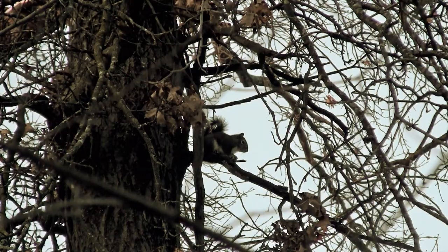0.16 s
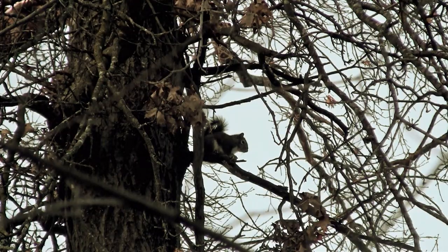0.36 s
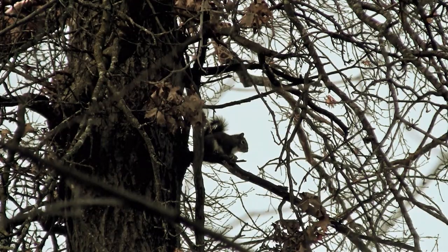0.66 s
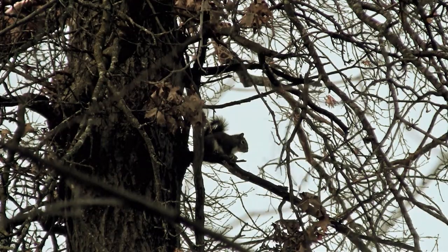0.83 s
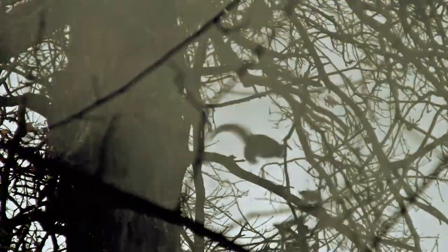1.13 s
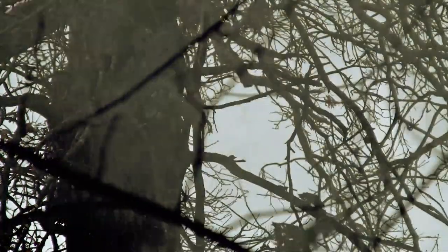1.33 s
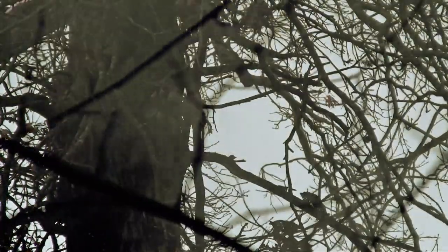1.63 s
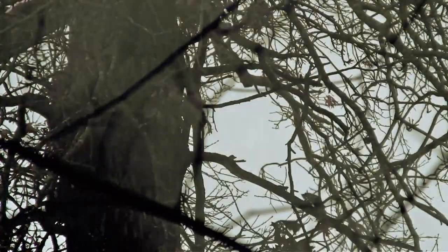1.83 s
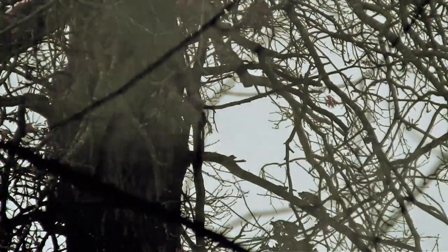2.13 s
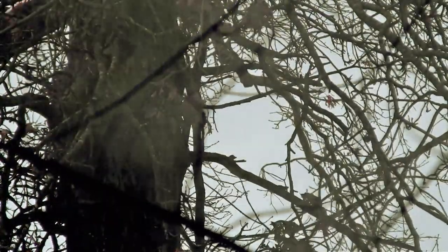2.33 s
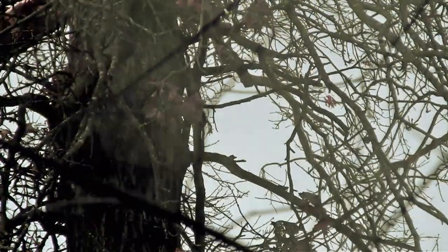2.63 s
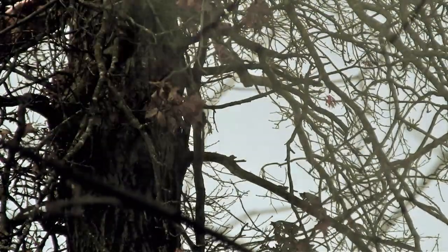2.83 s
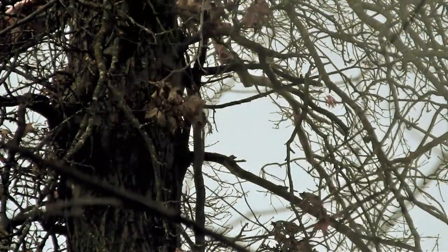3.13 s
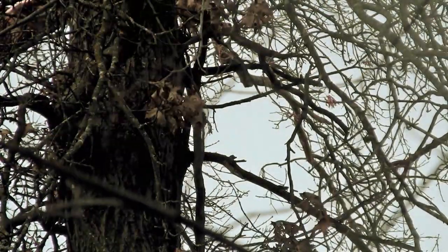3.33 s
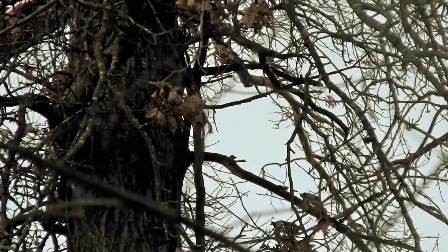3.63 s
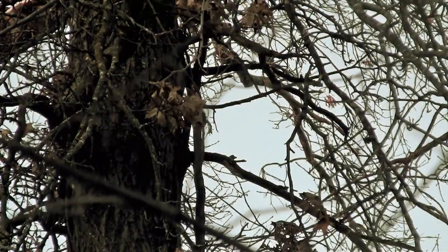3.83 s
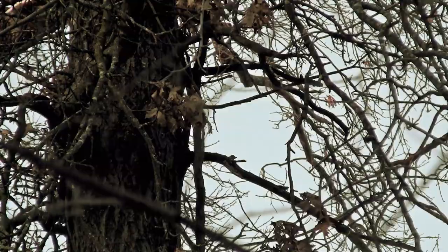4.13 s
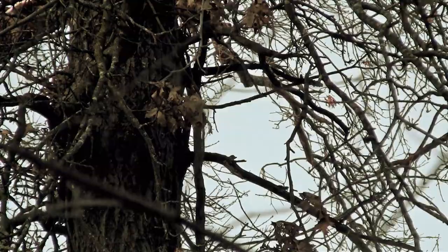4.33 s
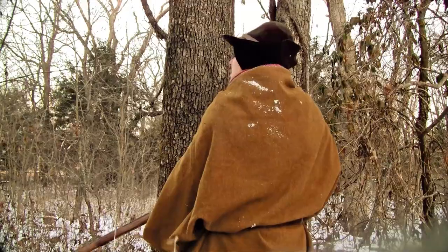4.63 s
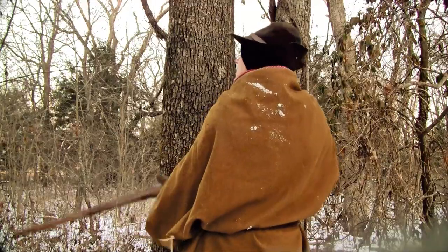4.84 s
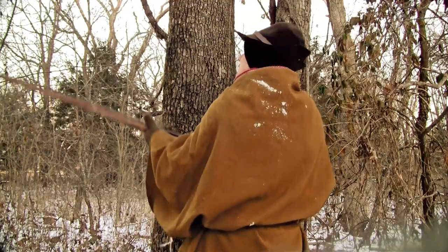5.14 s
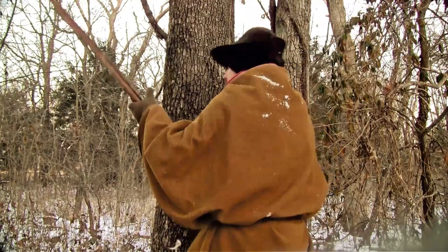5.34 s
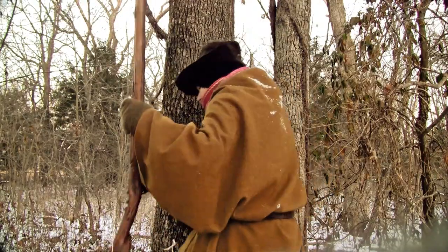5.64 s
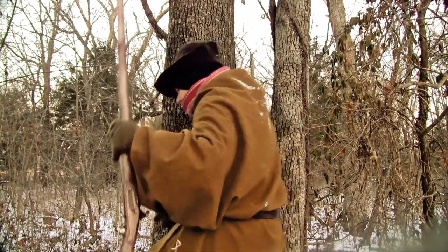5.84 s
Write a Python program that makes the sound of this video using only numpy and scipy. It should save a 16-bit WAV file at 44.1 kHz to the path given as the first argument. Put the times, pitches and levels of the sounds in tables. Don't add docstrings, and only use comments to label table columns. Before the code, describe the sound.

Near-silence outdoors, then a quick metallic rattle of flint on steel, a short powder hiss and a hard, overloaded gun blast. Strong slapping returns merge into a roll about a second long. Debris patters all around in wide stereo over soft leaf hiss, sparser each second. Near the end, a few close woody knocks, small button ticks and cloth swishes sit near the centre.

```python
import sys
import numpy as np
from scipy import signal
from scipy.fft import rfft, irfft, next_fast_len
from scipy.io import wavfile
from scipy.ndimage import uniform_filter1d

SR = 44100
rng = np.random.default_rng(int(sys.argv[2]) if len(sys.argv) > 2 else 0)


def boost_factor(decibels):
    exponent = np.asarray(decibels, float) / 20
    return 10 ** exponent


def to_wav(sig):
    pcm = np.clip(np.atleast_2d(sig), -1, 1) * 32767
    pcm = np.round(pcm).astype(np.int16)
    wavfile.write(sys.argv[1], SR, pcm.T)


N = 263686
T = np.arange(N) / SR
SIZE = next_fast_len(N)
HZ = np.maximum(np.arange(SIZE // 2 + 1) * SR / SIZE, 1)
BLAST_S, BLAST_PUSH_S = .8772, .002


def on_hz(table):
    hz, db = np.transpose(table)
    return boost_factor(np.interp(np.log(HZ), np.log(hz), db))


def walk(rate):
    hold = int(SR / rate)
    held = np.repeat(rng.standard_normal(N // hold + 1), hold)
    return uniform_filter1d(held, hold)[:N]


def grains(rate, spread_db):
    hits = rng.random(N) < rate / SR
    size_db = spread_db * np.minimum(rng.exponential(size=N), 3)
    x = hits * rng.standard_normal(N) * boost_factor(size_db)
    return x / np.std(x)


def wash(source, colour, width, centres_hz, levels_db):
    mid = rfft(source[0], SIZE) * on_hz(colour)
    side = rfft(source[1], SIZE) * on_hz(colour) * on_hz(width)
    out = 0
    for share, db in zip(np.eye(len(centres_hz)), levels_db):
        mask = np.interp(np.log(HZ), np.log(centres_hz), share)
        m = irfft(mid * mask, SIZE)[:N]
        s = irfft(side * mask, SIZE)[:N]
        pair = np.roll(np.array([m + s, m - s]), rng.integers(N), axis=1)
        out = out + boost_factor(db) / np.std(m) * pair
    return out


def curves(table, fade_s):
    s, *columns = np.transpose(table)
    outside = np.maximum(s[0] - T, 0) + np.maximum(T - s[-1], 0)
    return [np.interp(T, s, c) - 60 * outside / fade_s for c in columns]


def swells(floor_db, rows):
    power = boost_factor(2 * floor_db)
    for s, length_s, db in rows:
        power = power + boost_factor(2 * db) * np.exp(-((T - s) / length_s) ** 2)
    return 10 * np.log10(power + 1e-30)


def decay(t60):
    t = np.arange(int(t60 * 1.5 * SR) + 2) / SR
    return t, np.exp(-np.log(1000) * t / t60)


def ring(hz, t60, phase=0, rise_s=.0004):
    t, fade = decay(t60)
    return np.sin(2 * np.pi * hz * t + phase) * fade * (1 - np.exp(-t / rise_s))


def burst(hz, width_hz, t60, rise_s=.0007):
    t, fade = decay(t60)
    edges = np.clip([hz - width_hz / 2, hz + width_hz / 2], 30, .45 * SR)
    sos = signal.butter(3, edges, "band", fs=SR, output="sos")
    y = signal.sosfilt(sos, rng.standard_normal(len(t)) * fade * np.minimum(t / rise_s, 1))
    return y / np.abs(y).max()


def add(out, s, y, pan_db=0.):
    i = int(s * SR)
    y = y[:N - i]
    out[:, i:i + len(y)] += np.outer(boost_factor(np.array([pan_db, -pan_db]) / 2), y)


def add_opposed(out, s, y):
    i = int(s * SR)
    out[:, i:i + len(y)] += np.outer([1, -1], y)


# t/s, level/dB
DRONE_LEVEL = [(0.0, -74), (2.0, -74), (2.4, -91), (2.8, -82), (4.25, -75), (4.4, -75), (4.6, -86),
               (5.5, -78), (5.98, -82)]
# f/Hz, level/dB per Hz
AIR_COLOUR = [(15, -39), (25, -8.5), (59, -13), (86, 1), (169, -16.5), (198, -13), (263, -13.5),
              (361, -12.5), (534, -10.5), (578, -11), (2500, -19.5), (10300, -39.5), (13000, -55)]
# f/Hz, side minus mid level/dB
AIR_SPREAD = [(60, -9.5), (110, -11.5), (200, -0.5), (380, 5), (700, 4), (1290, 3.5), (2380, 0),
              (4400, -1.5), (8120, 2), (15000, 4.5)]


def woods():
    drone = curves(DRONE_LEVEL, 1)[0] + .9 * walk(7)
    air = -64 - .8 + 0.91 * walk(8)
    return wash(rng.standard_normal((2, N)), AIR_COLOUR, AIR_SPREAD, [105, 150], [drone, air])


# t/s, level/dB, dull part level/dB
SIFTING = [(1.5, -56.5, 9), (2.0, -58, 2.5), (2.7, -54.5, 2.5), (3.5, -59, -3.5), (4.35, -57.5, -3.5),
           (4.62, -73.5, 2.5), (5.05, -61, 0), (5.98, -64.5, 6.5)]
# t/s, length/s, level/dB, dull part level/dB
LEAF_AND_WOOL_SWISHES = [(1.486, 0.051, -51.5, 1), (1.723, 0.073, -57.5, 16.5), (1.965, .05, -54.5, 7.5),
                         (2.102, 0.098, -51.5, 2), (2.51, 0.08, -57, 1), (0.0, .015, -64, 6),
                         (2.595, 0.03, -44, -9), (2.632, 0.014, -43, -8), (2.73, .08, -51, -8),
                         (3.166, 0.036, -58.5, 5), (3.297, 0.078, -53.5, -12), (3.53, 0.066, -56.5, -4.5),
                         (3.848, 0.065, -51, -6.5), (4.318, 0.03, -52, -11), (4.799, 0.021, -66, 1),
                         (4.962, 0.036, -62.5, -7.5), (5.061, 0.019, -60.5, -6), (5.308, 0.045, -58.5, 5.5),
                         (5.424, 0.045, -52.5, 1.5), (5.646, 0.071, -43, -1), (5.786, 0.037, -51, -11),
                         (5.925, .025, -52, -2), (5.97, .03, -56, 2)]
# t/s, length/s, level/dB
BOUGH_HEAVES = [(1.97, .07, -65), (2.647, 0.084, -54), (3.4, 0.064, -62.5), (3.698, 0.25, -59),
                (4.402, 0.069, -63.5), (5.151, 0.045, -47), (5.635, 0.091, -54), (5.946, 0.056, -57.5)]
# f/Hz, level/dB per Hz
RUSTLE_TONE = [(88, -40), (150, -22.5), (248, -9.5), (332, -1), (584, 3), (781, 0), (1630, -0.5),
               (2500, -6), (3420, -1), (4750, -7.5), (5770, -2.5), (9370, -4.5), (10900, -4.5),
               (13500, -16), (15000, -9)]
# f/Hz, side minus mid level/dB
RUSTLE_SPREAD = [(60, -12), (110, -11.5), (200, -16), (380, -20), (700, -9), (1290, -20), (2380, -23.5),
                 (4400, -30), (8120, -12.5), (15000, 1.5)]


def rustle():
    sift, = curves([row[:2] for row in SIFTING], .8)
    dull, = curves([(s, db + dull_db) for s, db, dull_db in SIFTING], 0.88)
    heave_floor, = curves([(SIFTING[0][0], -70), (N / SR, -70)], .8)
    dull_swishes = [(s, length_s, db + dull_db) for s, length_s, db, dull_db in LEAF_AND_WOOL_SWISHES]
    high = swells(sift, [row[:3] for row in LEAF_AND_WOOL_SWISHES])
    mid = swells(dull, dull_swishes)
    low = swells(heave_floor, BOUGH_HEAVES)
    crackle = [0.6 * rng.standard_normal(N) + .5 * grains(2000, 3.2) for _ in range(2)]
    flicker = 1.8 * walk(45)
    levels = [
        low - 3 + 1.8 * walk(31),
        mid - 3 + flicker,
        (mid + high) / 2 - 4 + flicker + 2.3 * walk(70),
        high + flicker + 1.0 * walk(98),
        high - 14 + flicker + 5 * (T > 4.3),
    ]
    return wash(crackle, RUSTLE_TONE, RUSTLE_SPREAD, [450, 1500, 3500, 9500, 15000], levels)


def bit_hit(out, s, db, hz, dull_db, pan_db):
    t60 = 0.007 * boost_factor(0.1 * (db + 43.0))
    wide, soft, late = rng.random(3)
    snap = burst(hz, 0.52 * hz, 1.5 * t60, .0003 + 0.0008 * soft)
    tick = burst(7000, 7000, .35 * t60, .0005)
    tap = burst(1380, 1450, 2.2 * t60)
    bounce = burst(hz * (.7 + 1.2 * wide), 1.0 * hz, t60)
    scatter = burst(6140, 7900, 6 * t60, 0.005)
    add(out, s, boost_factor(db - 9.5) * snap, pan_db)
    add(out, s, boost_factor(db - 8 - 7 * wide) * tick, pan_db)
    add(out, s, boost_factor(db + dull_db - 3.5) * tap, pan_db)
    add(out, s + 0.0045 + 0.014 * late, boost_factor(db - 16.5) * bounce, pan_db)
    add(out, s - .004, boost_factor(db - 17) * scatter, -pan_db)


# t/s, peak level/dB, f/Hz, dull part level/dB
TWIG_HITS = [(1.408, -14, 2340, -43), (1.4908, -36, 3220, 20), (1.507, -18, 2600, -5),
             (1.657, -13.5, 3260, -2.5), (1.7056, -35, 2620, 2), (1.7504, -26, 2690, 3),
             (1.8103, -20, 3360, -5), (1.887, -17.5, 3000, -1), (1.951, -29, 3360, -21),
             (2.02, -26, 6500, -18), (2.0738, -24.5, 3500, -30), (2.189, -25, 2890, -3),
             (2.473, -34, 5900, -12), (2.5119, -15.5, 4080, -15.5), (2.826, -30, 5500, -11),
             (2.882, -33.5, 2800, -7), (2.9036, -28, 3050, -28), (3.061, -31, 4240, -24),
             (3.1214, -21, 7000, -28), (3.298, -27.5, 3450, -15), (3.3715, -34.5, 3060, -30.5),
             (3.8172, -29, 3900, -8), (3.851, -25.5, 3880, -13.5), (4.152, -31, 3760, -13),
             (4.184, -27, 3430, -11.5), (4.404, -23.5, 3070, -17), (4.766, -39, 3420, -15.5)]
# t/s, peak level/dB, f/Hz, left minus right level/dB
LEAF_HITS = [(1.6332, -20, 10080, 11), (1.8505, -22.5, 8770, -4), (1.87, -26.5, 8280, -10),
             (1.9301, -36, 5910, 6), (2.259, -32, 8930, -9), (2.3405, -31, 6360, -4.5),
             (2.3691, -27, 7800, 13.5), (2.4456, -19, 8230, 3.5), (2.571, -28.5, 9520, -4),
             (2.59, -28, 8600, -10), (2.9647, -24.5, 8480, 10), (3.0224, -28.5, 7040, -6),
             (3.224, -22.5, 9520, 6), (3.2856, -24, 8200, 1.5), (3.3053, -27, 6740, -2.5),
             (3.41, -31, 6570, 2), (3.501, -29, 6650, -6), (3.521, -27.5, 7920, 2),
             (3.55, -29.5, 9100, -2.5), (3.617, -29, 9800, 4), (3.7137, -29, 10310, -6.5),
             (3.769, -37, 7680, -2), (3.792, -27.5, 9900, -2.5), (3.9914, -31.5, 7600, -3),
             (4.1125, -30.5, 6050, -8), (4.27, -49, 6200, 8.5), (4.2857, -32.5, 6200, 5),
             (4.6424, -37.5, 10050, 3.5)]
# t/s, peak level/dB, f/Hz
BUTTON_TICKS = [(5.018, -29, 10950), (5.0474, -47, 2980), (5.0966, -30, 3620), (5.283, -42, 3270),
                (5.4216, -30, 3530), (5.499, -33, 10030), (5.521, -31, 9500), (5.5657, -43, 3320),
                (5.7609, -30, 4140), (5.8113, -29, 3650), (5.9163, -25, 9450), (5.9601, -38, 10700)]
# t/s, peak level/dB, f/Hz
MORE_TICKS = [(1.641, -29, 9500), (2.028, -29.5, 7480), (2.043, -27.5, 7500), (2.1853, -30, 3000),
              (2.3107, -35.5, 9680), (2.969, -28, 8680), (3.1862, -36, 3460), (3.414, -33, 7100),
              (3.455, -36, 8430), (3.6032, -40, 9650), (3.6421, -40, 4540), (3.6935, -42, 9150),
              (4.5671, -45.5, 6100), (4.6165, -45.5, 10300), (4.7724, -33, 8860), (4.8513, -39, 8000),
              (4.865, -47, 8100), (4.8938, -47.5, 9500), (4.905, -50, 8560), (4.918, -45, 9000),
              (4.9422, -43.5, 9960), (5.0041, -40, 3350), (5.308, -35.5, 3540), (5.3465, -36, 8870),
              (5.3732, -37.5, 3470), (5.8706, -36, 9550)]


def debris():
    out = np.zeros((2, N))
    for s, db, hz, dull_db in TWIG_HITS:
        bit_hit(out, s, db, hz, dull_db, -2.5 + 7 * rng.standard_normal())
    for s, db, hz, pan_db in LEAF_HITS:
        bit_hit(out, s, db, hz, -19, pan_db)
    for s, db, hz in BUTTON_TICKS + MORE_TICKS:
        bit_hit(out, s, db, hz, -10.5, -2)
    return out


# t/s, peak level/dB, f/Hz, ring/s
DULL_THUMPS = [(1.3, -51, 170, 0.031), (2.63, -57, 140, .12), (4.42, -70, 95, .17), (5.476, -57, 170, .06),
               (4.9, -58, 180, 0.044), (5.39, -60, 120, .08), (1.12, -42, 90, .15), (1.25, -44, 70, .15)]
# t/s, peak level/dB, f/Hz, ring/s, brightness level/dB
STOCK_KNOCKS = [(4.405, -57, 633, .15, -28), (5.067, -35.5, 1087, 0.035, -12),
                (5.076, -35, 1100, 0.049, -18), (5.083, -41, 795, 0.056, -16), (5.097, -45, 910, 0.02, -12),
                (5.115, -29.5, 1120, 0.051, -3.5), (5.141, -35.5, 1036, 0.03, -4),
                (5.148, -40, 1070, 0.03, -4), (5.151, -44, 707, 0.1, -15), (5.16, -45, 535, 0.08, -9),
                (5.228, -47.5, 717, 0.17, -34), (5.292, -46, 1410, .023, -3.5),
                (5.322, -32.5, 1040, 0.005, -3), (5.375, -32, 500, 0.012, -9),
                (5.473, -35, 1200, 0.012, -8)]
# f/Hz, level/dB
GUN_MODES = [(614, -7), (1550, -23), (2051, -7), (2950, -8), (3505, -3.5), (4667, -10), (6400, -6.5)]


def stock():
    out = np.zeros((2, N))
    add(out, 5.067, boost_factor(-42.0) * ring(3000, 0.09))
    for s, db, hz, t60 in DULL_THUMPS:
        add(out, s, boost_factor(db) * burst(hz, hz, t60, t60 / 10))
    for s, db, hz, t60, bright_db in STOCK_KNOCKS:
        add(out, s, boost_factor(db + 4.5) * ring(hz, t60, rise_s=0.00042))
        add(out, s, -boost_factor(db + bright_db + 15) * ring(1200, .003, rise_s=.0002))
        add(out, s, boost_factor(db + 1) * burst(847, 1200, 1.13 * t60))
        for mode_hz, mode_db in GUN_MODES:
            detuned_hz = mode_hz * (1 + .03 * rng.standard_normal())
            mode_t60 = t60 * (1000 / mode_hz) ** .6
            mode = ring(detuned_hz, mode_t60, rng.standard_normal())
            add(out, s, boost_factor(db + bright_db + 6 + mode_db) * mode)
    return out


# t/s, peak level/dB, f/Hz
SINGLE_RETURNS = [(0.884, -5, 440), (0.89, -9.5, 1100), (0.907, -10, 700), (0.915, -6.5, 600),
                  (0.9195, -4.5, 550), (0.941, -4, 920), (0.947, -12, 1300), (0.964, -9, 910),
                  (0.99, -10, 500), (1.039, -8.5, 410), (1.084, -19, 800), (1.129, -12, 810),
                  (1.16, -9.5, 600), (1.241, -7, 690)]
# t/s, level/dB
ROLLING_ECHO = [(0.883, -22.5), (1.0, -21.5), (1.07, -23.5), (1.14, -20), (1.3, -23.5), (1.52, -27),
                (1.8, -36.5), (2.25, -47), (3.3, -66.5)]
# offset level/dB, extra loss/dB per s
BAND_LOSS = [
    (-8, 36.5),
    (-1, 23),
    (-3, 46.5),
]
# f/Hz, level/dB per Hz
ECHO_COLOUR = [(15, -65), (25, -37), (126, -31.5), (233, -18), (359, -9.5), (782, -3), (1170, -3),
               (1270, -4.5), (1600, -5.5), (2050, -11.5), (2770, -15.5), (3170, -12), (4150, -18),
               (10100, -26.5), (15500, -50)]
# f/Hz, side minus mid level/dB
ECHO_SPREAD = [(60, -12.5), (110, -20), (200, -19), (380, -17), (700, -11), (1290, -9.5), (2380, -7.5),
               (4400, -6), (8120, -4.5), (15000, 6.5)]


def echo():
    out = np.zeros((2, N))
    spread_s = 0.011
    for s, db, hz in SINGLE_RETURNS:
        puff = burst(hz, 1.0 * hz, 1.2 * spread_s, spread_s / 4)
        add(out, s, boost_factor(db - 5.0) * puff, 2 * rng.standard_normal())
    body, = curves(ROLLING_ECHO, 0.0098)
    since_shot = np.maximum(T - BLAST_S, 0)
    rumble, presence, air = (body + db - loss_db * since_shot for db, loss_db in BAND_LOSS)
    trunks = [.9 * rng.standard_normal(N) + .3 * grains(1500, 2.5) for _ in range(2)]
    swell = 1.6 * walk(35)
    upper = 0.45 * body + 0.55 * presence + 2
    levels = [
        rumble + 4 * walk(23),
        body - 3 + swell,
        upper + swell + 0.28 * walk(28),
        presence + swell,
        air + 1.2 * walk(87),
    ]
    return out + wash(trunks, ECHO_COLOUR, ECHO_SPREAD, [100, 480, 1200, 2700, 7500], levels)


# t/s, peak level/dB, brightness level/dB, ring/s, f/Hz of the part that rings most
LOCK_BLOWS = [(.7762, -12, -8, .02, 1900), (.7795, -13, -22, .016, 1500), (.7845, -4, -12, .016, 1300),
              (.7866, -1, -12, .016, 2600), (.7905, -11, -20, .02, 1500), (.794, -4, -12, .018, 1100),
              (.7978, -1, -15, .018, 2500), (.8045, -10, -20, .014, 3100), (.8222, -14, -16, .018, 3200),
              (.8355, -14, -14, .02, 3200), (.844, -22, -18, .015, 2500)]
# f/Hz, level/dB
STEEL_MODES = [(735, -15), (1100, -7.5), (1450, 0), (1620, 1.5), (2150, -4), (2440, 2.5), (2780, -2),
               (3200, -1.5), (4100, -6.5), (6300, -18)]
# t/s, level/dB
SCRAPE_AND_FIZZ = [(0.773, -68.5), (0.777, -20.5), (0.802, -19), (0.808, -30.5), (0.866, -40),
                   (0.871, -40.5), (0.878, -13.5), (0.883, -16.5), (0.902, -39)]
# f/Hz, level/dB per Hz
FIZZ_TONE = [(100, -43.5), (300, -11), (700, 6.5), (1500, 1), (3200, -1), (3800, -9), (6000, -13.5),
             (10500, -24.5), (12500, -27.5), (15500, -63)]


def lock():
    out = np.zeros((2, N))
    for s, db, bright_db, t60, struck_hz in LOCK_BLOWS:
        for hz, mode_db in STEEL_MODES:
            detune, phase = rng.standard_normal(2)
            near_db = -6 * abs(np.log2(hz / struck_hz))
            mode = ring(hz * (1 + 0.018 * detune), t60 * (1500 / hz) ** 0.53, phase, 0.00068)
            add(out, s, boost_factor(db - 2.0 + mode_db + near_db) * mode, -.5)
        add(out, s, boost_factor(db + bright_db) * burst(6000, 6000, 0.0029, 0.00033))
    s, db = np.transpose(SCRAPE_AND_FIZZ)
    level = np.interp(T, s, db, left=-150, right=-150) + 2 * walk(500)
    width = [(60, -12.0), (2400, -10.5), (8000, 1.0), (15000, 13.0)]  # f/Hz, side minus mid level/dB
    return out + wash(rng.standard_normal((2, N)), FIZZ_TONE, width, [1000], [level])


# f/Hz, level/dB, ring/s
MUZZLE_RING = [
    (224, -15, 0.073),
    (1260, -2.5, 0.01),
    (2700, -11.5, 0.0054),
]


def blast():
    out = np.zeros((2, N))
    t = np.arange(int(3 * BLAST_PUSH_S * SR)) / SR / BLAST_PUSH_S
    add(out, BLAST_S, np.where(t < 1, -.8 * t ** 2, .7 * np.exp(-4 * (t - 1) ** 4)))
    for hz, db, t60 in MUZZLE_RING:
        add(out, BLAST_S + BLAST_PUSH_S, boost_factor(db) * ring(hz, t60), 1)
    jet = boost_factor(-7) * burst(7000, 8000, .012, .002)
    nearest_trunks = boost_factor(-5) * burst(650, 600, 0.037, 0.003)
    add_opposed(out, BLAST_S, jet)
    add_opposed(out, BLAST_S + 0.0008, nearest_trunks)
    add(out, BLAST_S - .0005, boost_factor(-6.5) * burst(4000, 6700, 0.0073, 0.0019))
    add(out, BLAST_S - .0075, boost_factor(-14.5) * burst(800, 760, 0.041, 0.0089))
    return out


def scene():
    return woods() + rustle() + debris() + stock() + echo() + lock() + blast()


def roll_off(x):
    return signal.sosfilt(signal.butter(12, 15680, fs=SR, output="sos"), x)


# t/s, level/dB, settling/s
LEVEL_SLIP = (4.345, -60, .15)


def record(dry):
    mic = signal.sosfilt(signal.butter(2, [75, 15000], "band", fs=SR, output="sos"), dry)
    s, db, settle_s = LEVEL_SLIP
    slip = np.interp(T, [s, s + .02, s + settle_s, s + settle_s + .03], [0, 1, .4, 0])
    mix = np.clip(mic + boost_factor(db) * slip, -1, 1)
    return roll_off(mix)


dry = scene()
out = record(dry)
to_wav(out)
```